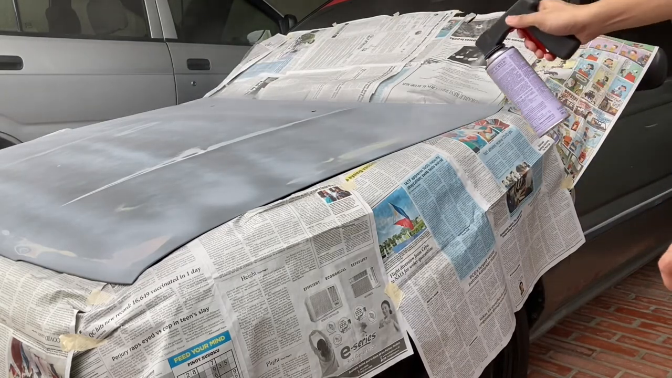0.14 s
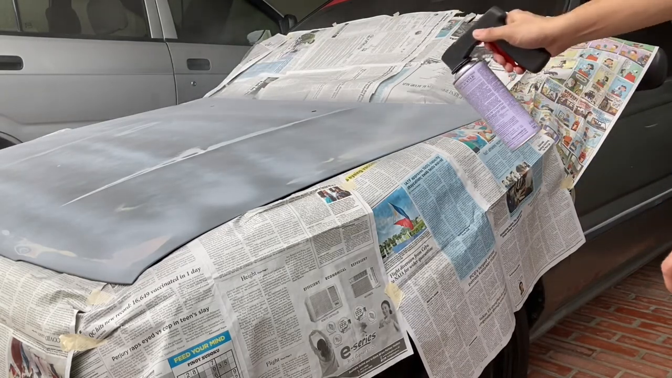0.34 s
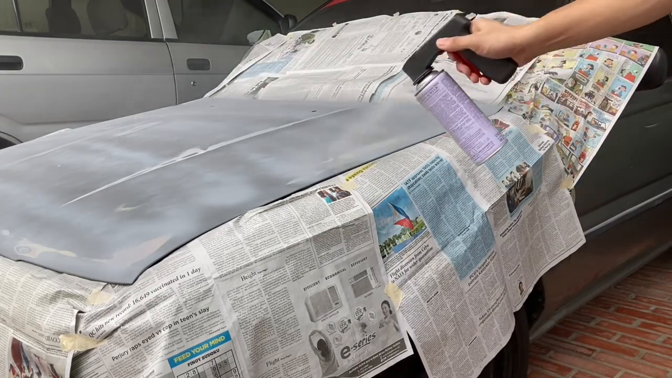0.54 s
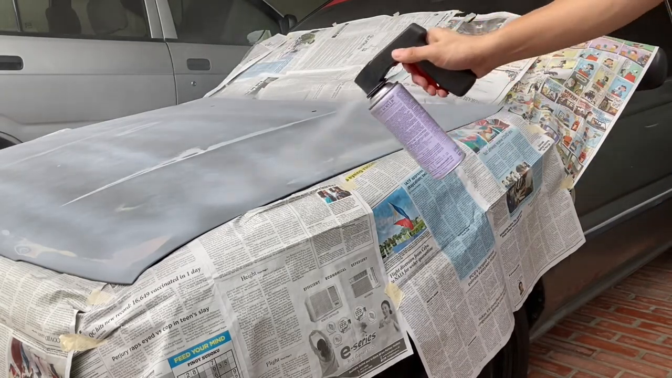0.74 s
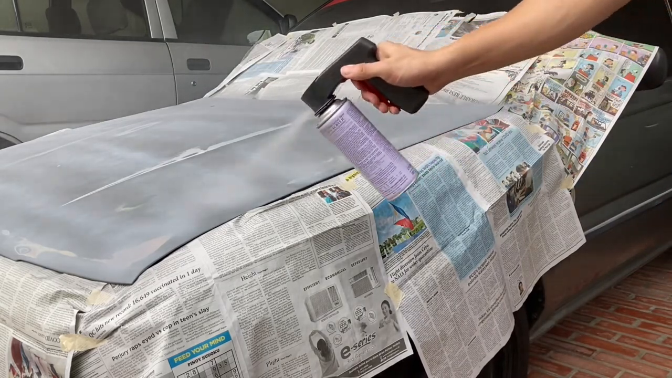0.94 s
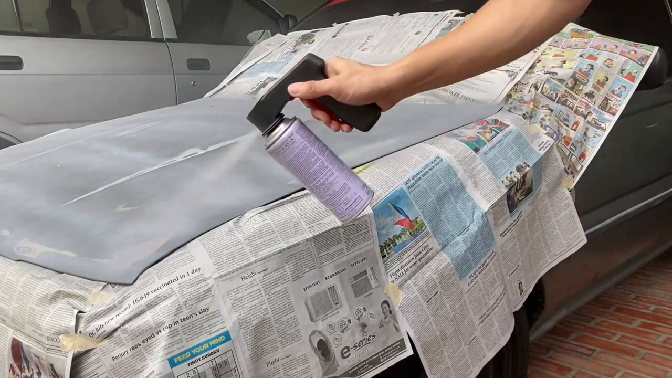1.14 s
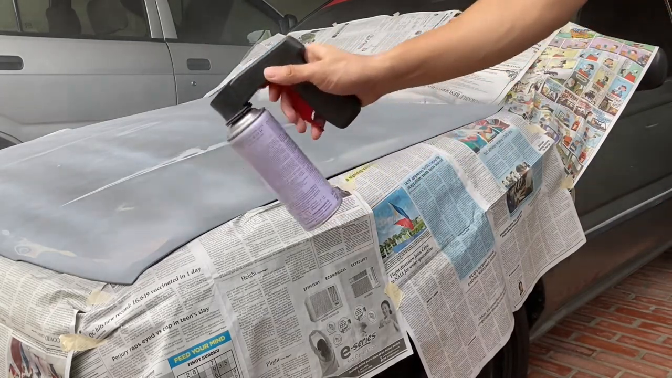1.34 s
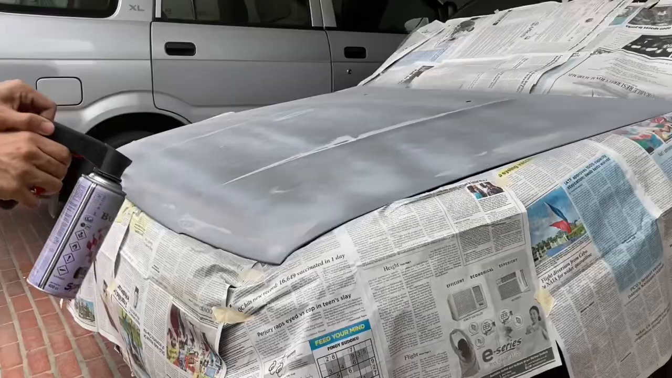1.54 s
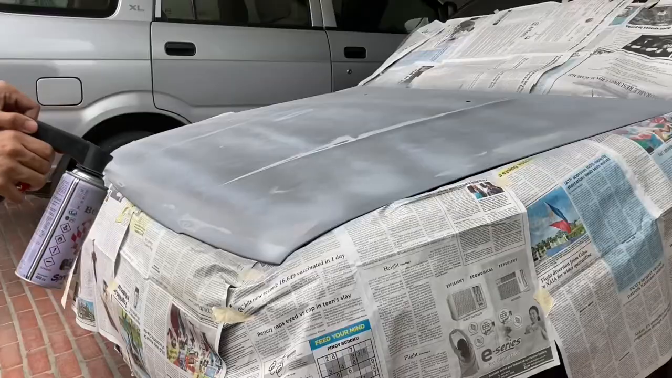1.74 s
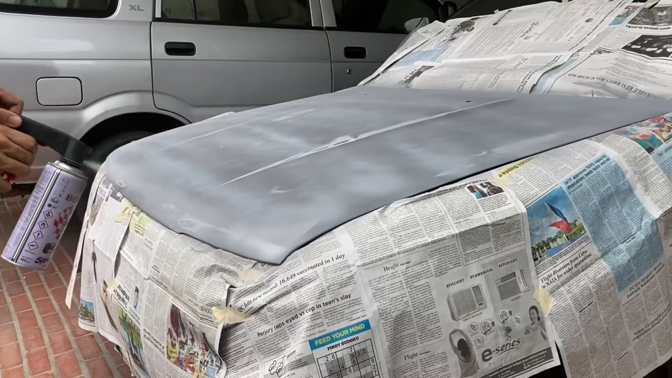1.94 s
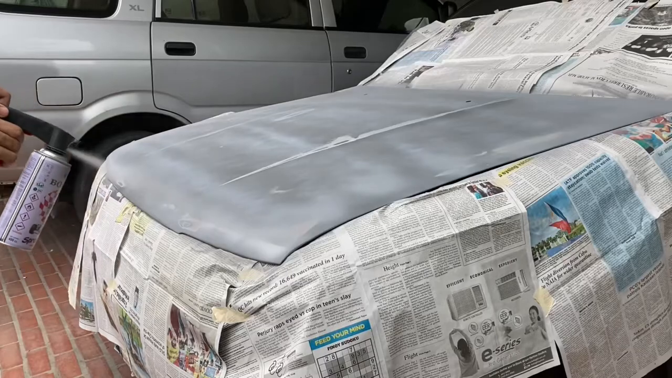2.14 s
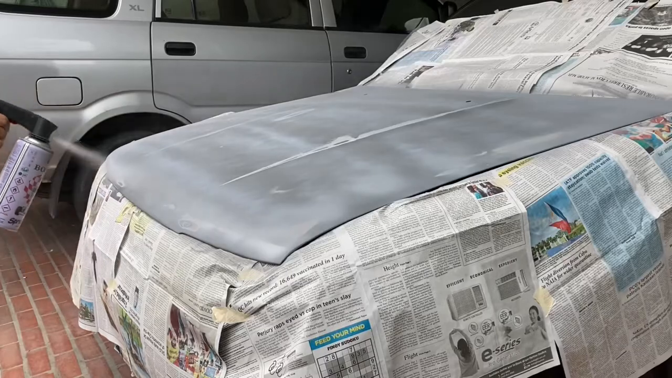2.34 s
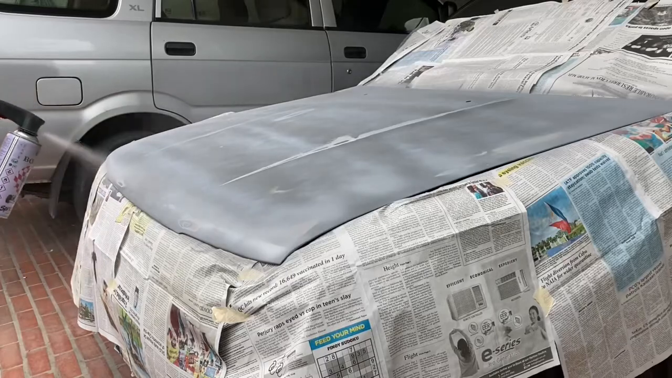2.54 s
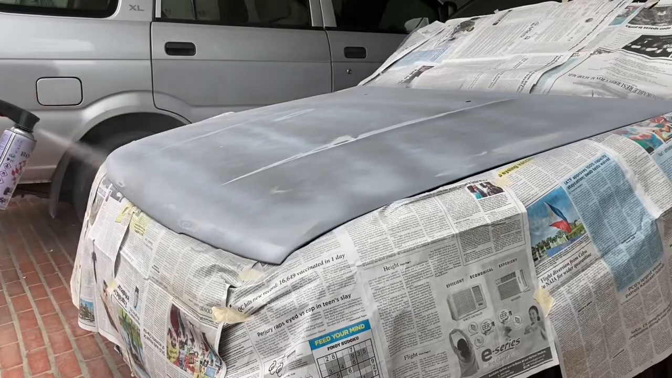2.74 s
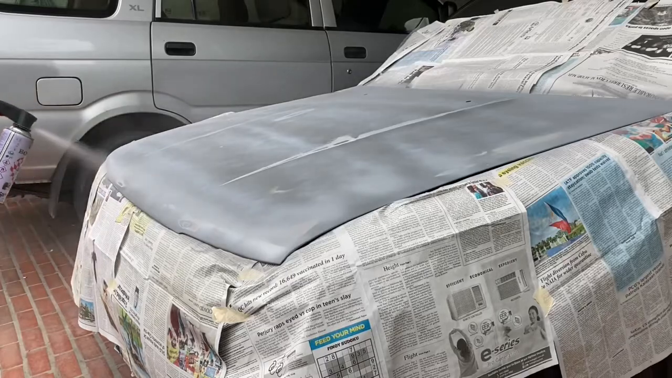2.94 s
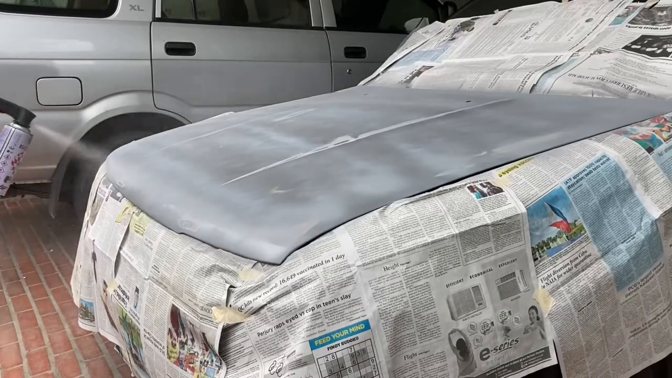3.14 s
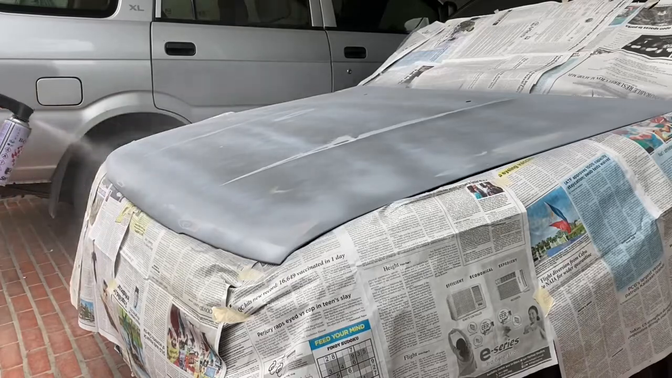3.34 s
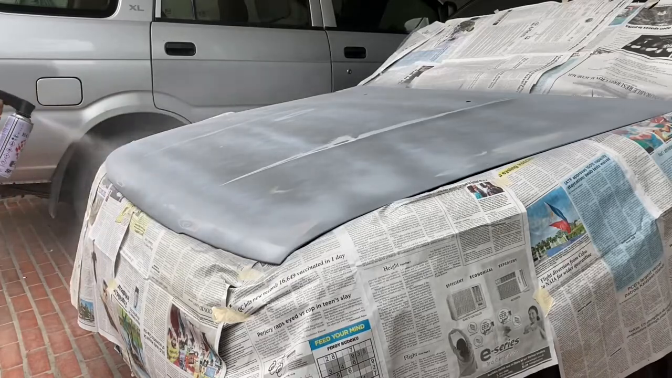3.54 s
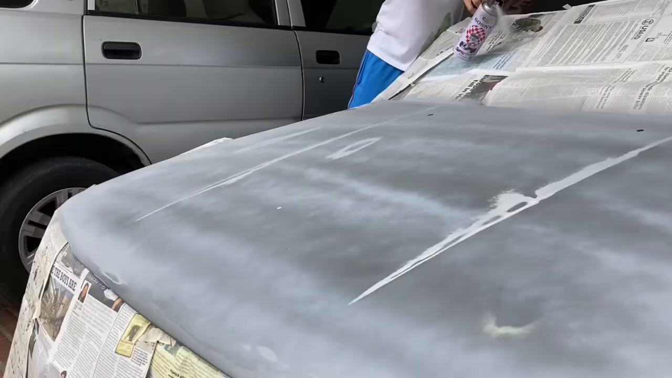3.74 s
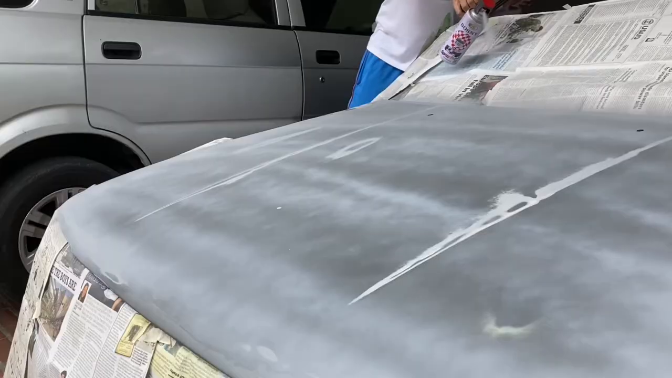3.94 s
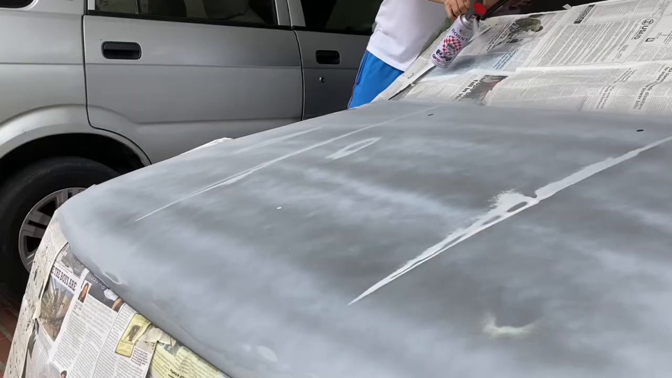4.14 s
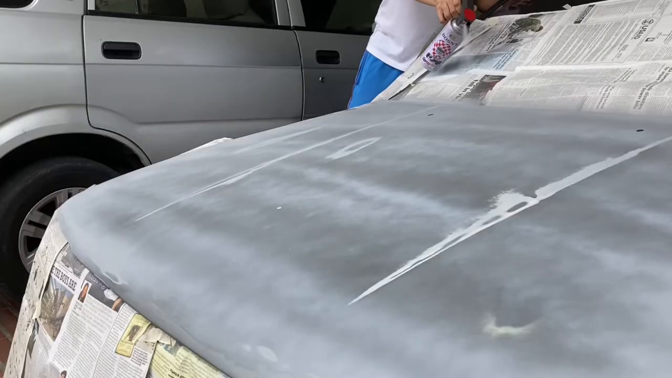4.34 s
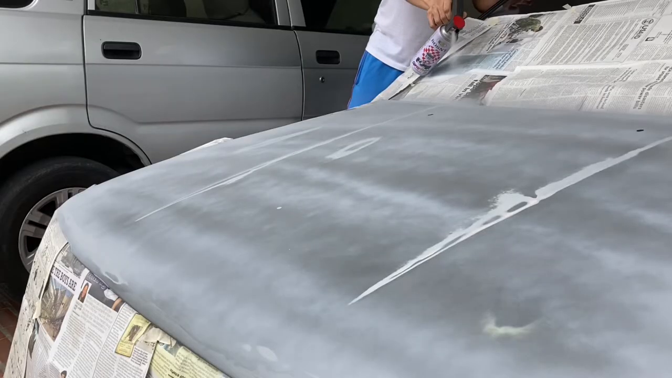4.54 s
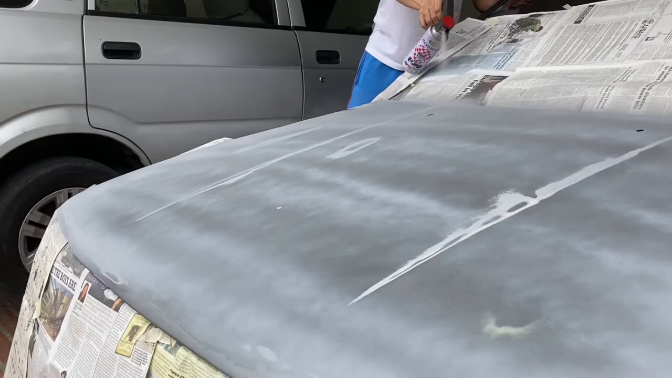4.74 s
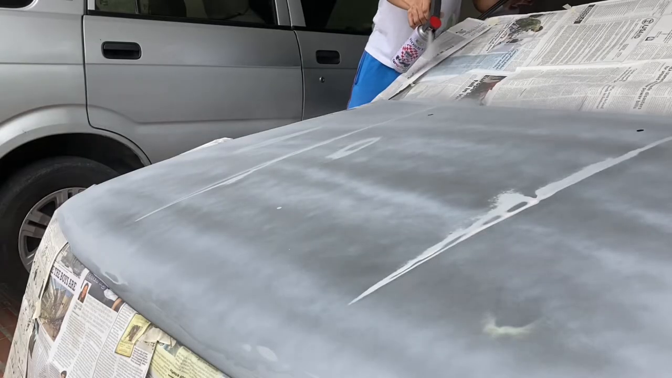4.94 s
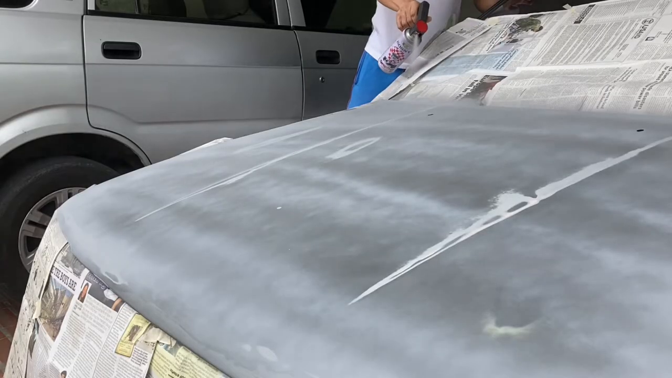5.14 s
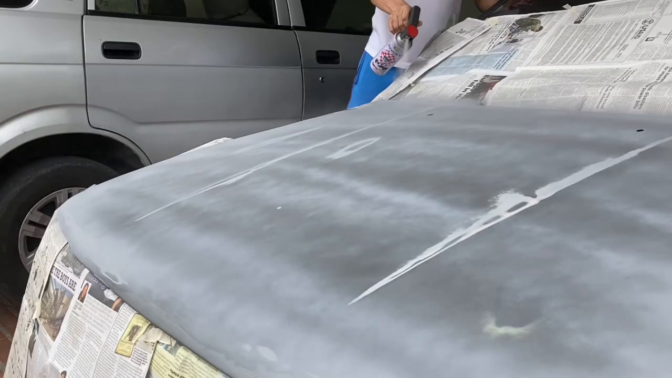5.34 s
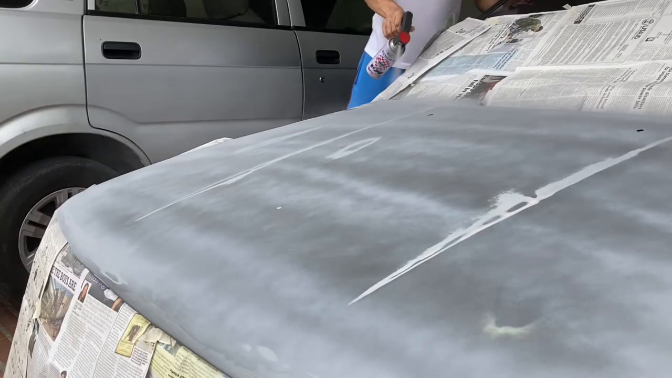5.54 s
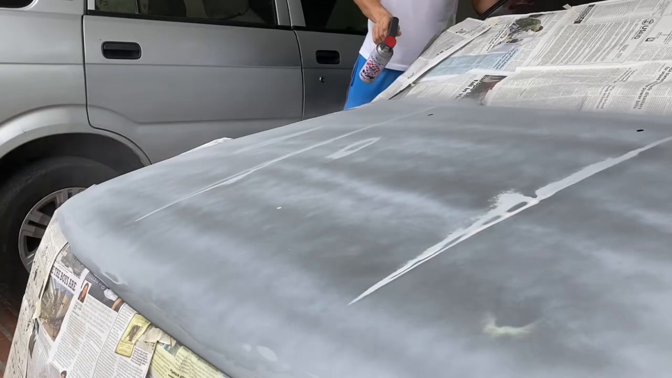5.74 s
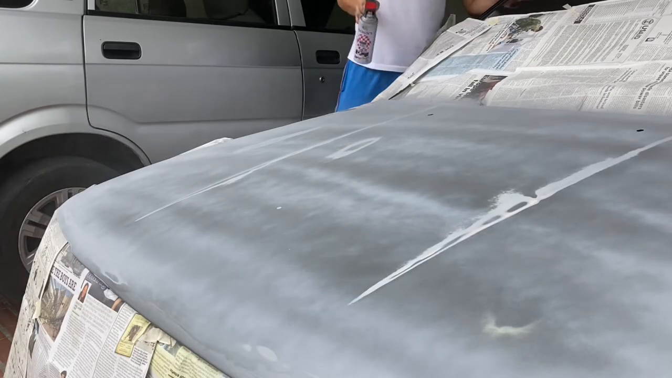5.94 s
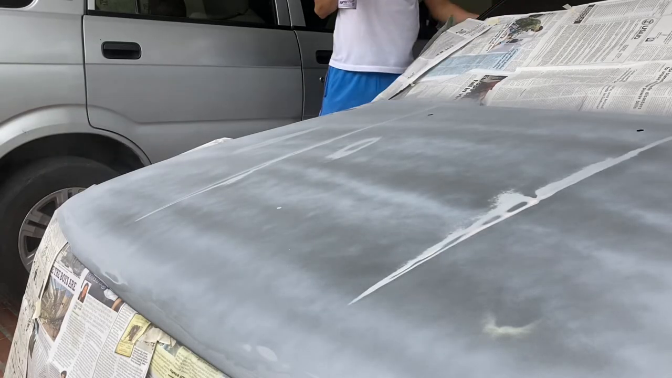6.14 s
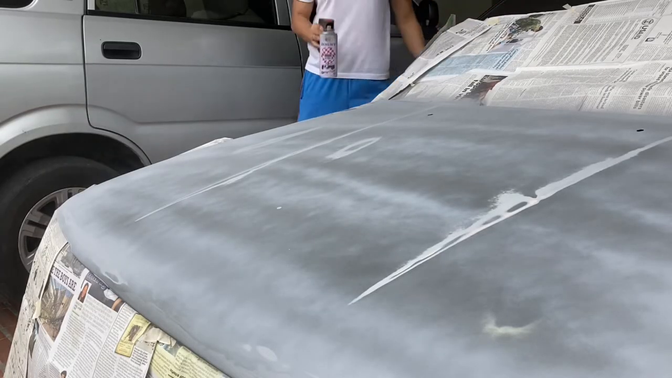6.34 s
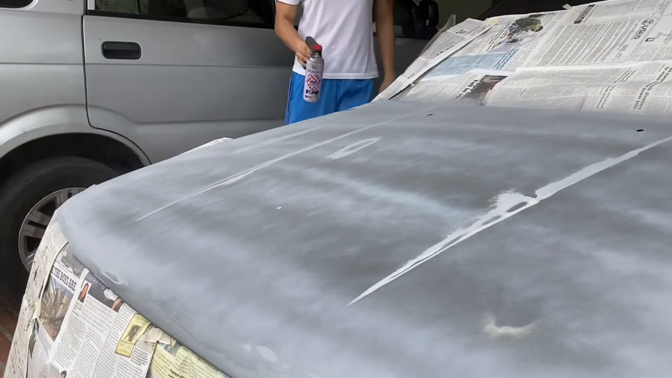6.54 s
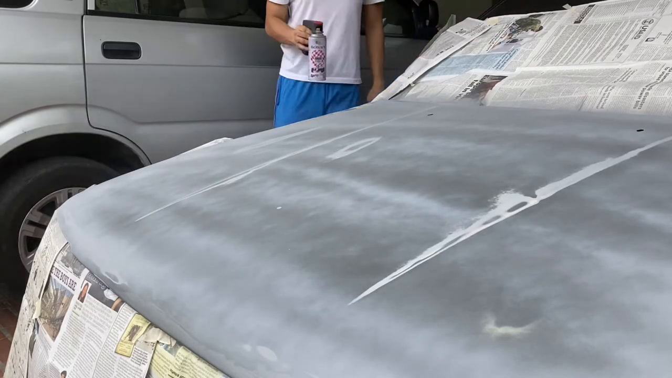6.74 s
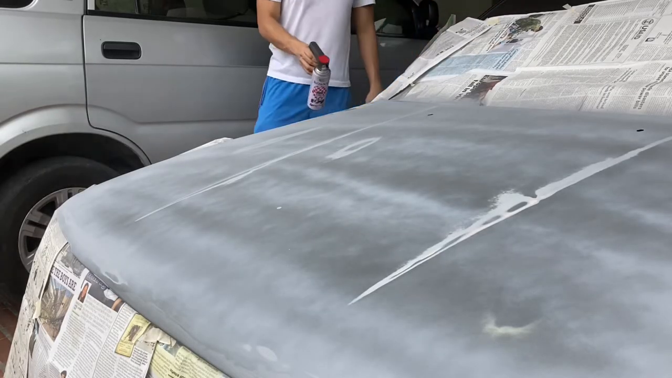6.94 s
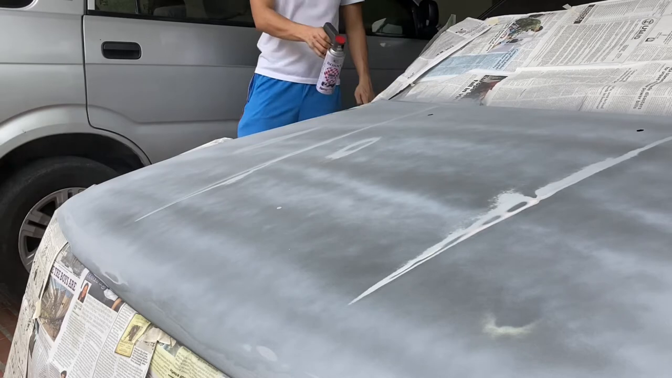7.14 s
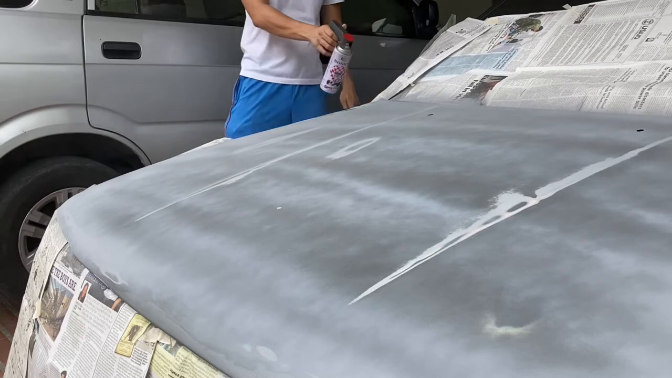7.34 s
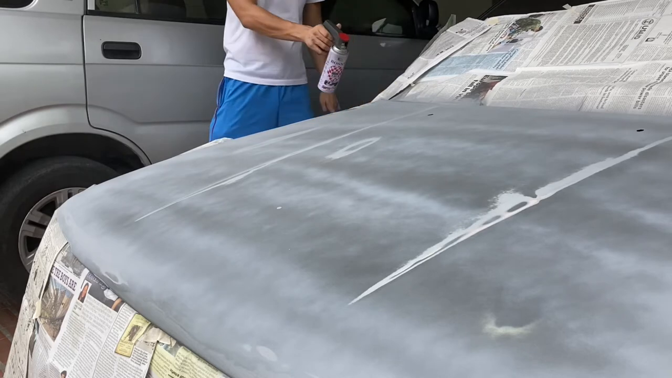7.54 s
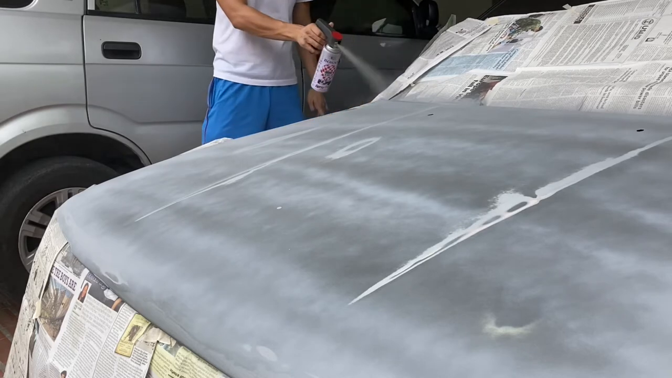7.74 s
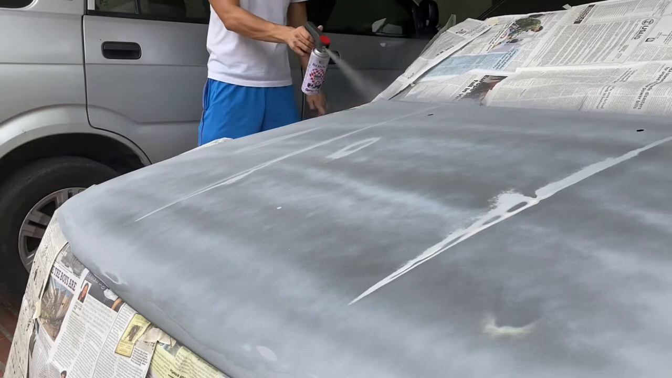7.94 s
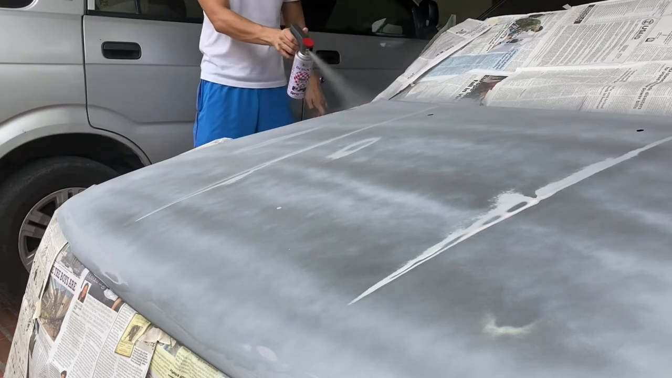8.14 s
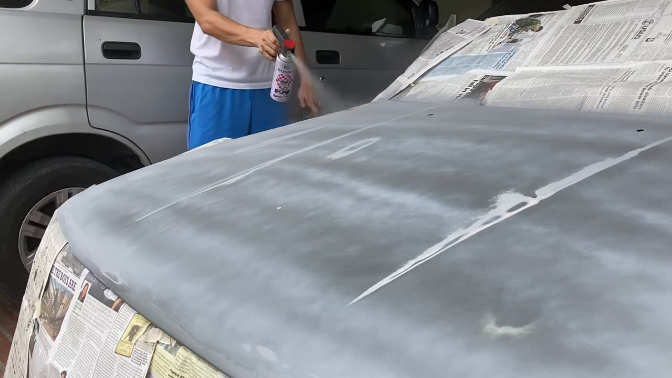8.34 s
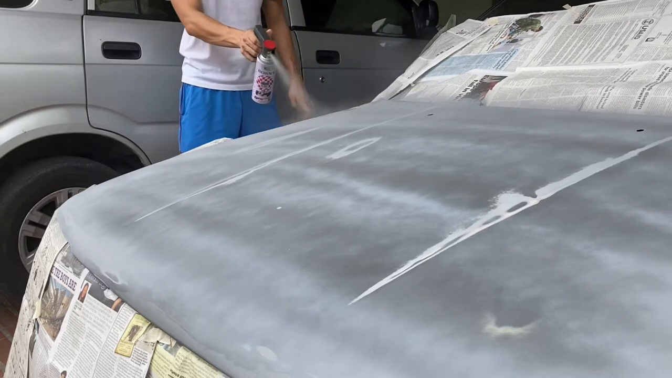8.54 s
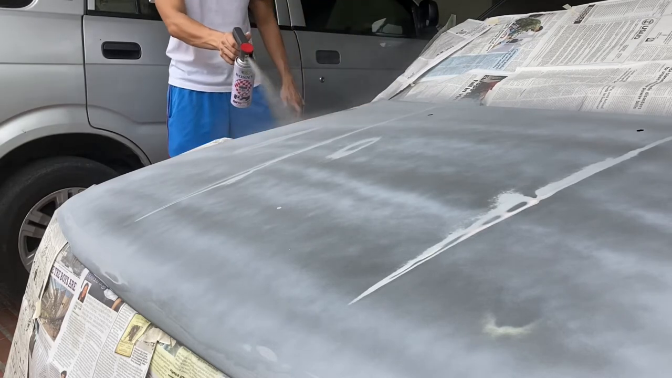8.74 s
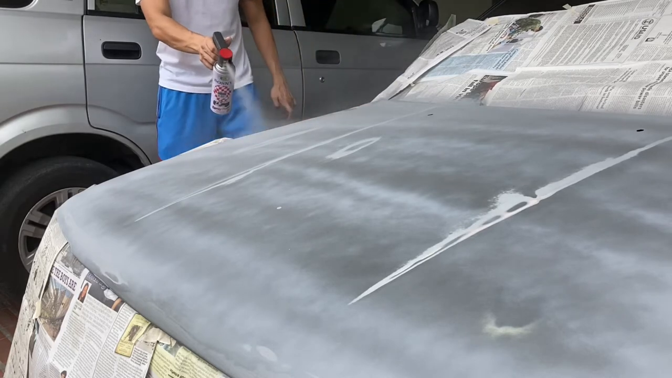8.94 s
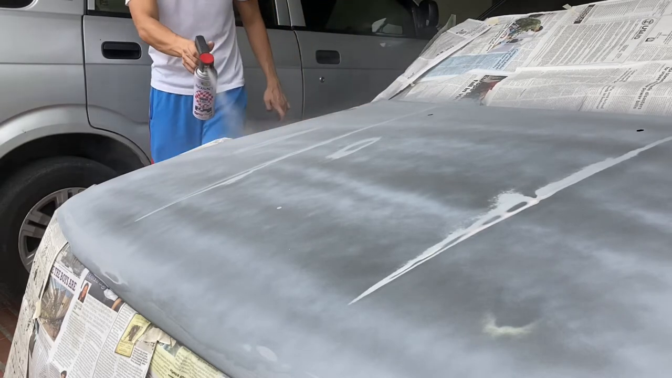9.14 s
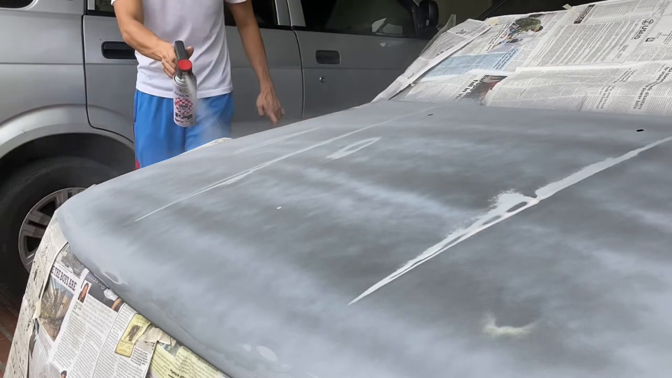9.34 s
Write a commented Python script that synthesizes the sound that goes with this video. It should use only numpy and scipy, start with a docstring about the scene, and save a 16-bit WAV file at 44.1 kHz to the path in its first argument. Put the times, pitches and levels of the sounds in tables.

```python
"""An aerosol can sprays a car bonnet in a brick yard: four passes, the first much louder, the others quieter.
The jet is shaped turbulent noise, with sliding bright and dark bands and sweeping ground and bonnet echoes.
Before the last pass the can is shaken: the ball rings damped modes, paint sloshes as gliding tones, foam fizzes.
Town rumble, faint far whines and one handling bump lie beneath, all shaped noise and gliding sines.
The can is heard through two close phone microphone ports; the whole level dips briefly after the second pass."""
import sys
import numpy as np
from scipy import signal
from scipy.fft import rfft, irfft, next_fast_len
from scipy.io import wavfile
from scipy.ndimage import map_coordinates

SR = 44100
rng = np.random.default_rng(int(sys.argv[2]) if len(sys.argv) > 2 else 0)


def output_pcm(signal):
    """Save a mono or channel-first signal as 16-bit PCM at the path in sys.argv[1].

    Samples are clipped to [-1, 1] before scaling.
    """
    pcm = np.clip(np.atleast_2d(signal).T, -1, 1) * 32767
    wavfile.write(sys.argv[1], SR, np.round(pcm).astype(np.int16))


N = 414099
T = np.arange(N) / SR
F = np.fft.rfftfreq(next_fast_len(N), 1 / SR) + 1e-6


def undb(db):
    """Decibels to gain."""
    return 10 ** (np.asarray(db) / 20)


def track(rows, t=T):
    """Columns of a curve, read at the times t."""
    s, *columns = np.transpose(rows)
    return [np.interp(t, s, column) for column in columns]


def slope(points, f=F, axis=1):
    """One dB column of a spectrum, joined on a log-frequency axis."""
    points = np.array(points)
    return np.interp(np.log(f + 1), np.log(points[:, 0]), points[:, axis])


def bell(f, centre, width):
    """A rounded peak of height 1 that falls to 1/e one width from its centre."""
    return np.exp(-((f - centre) / width) ** 2)


def shape(x, gain):
    """Filter by a gain for each frequency."""
    size = next_fast_len(N)
    return irfft(rfft(x, size) * gain, size)[..., :N]


def unit(x):
    """Scale to rms 1."""
    return x / np.sqrt(np.mean(x ** 2))


def walk(rate, size=N):
    """A random wander around zero: straight lines between fresh values, rate of them per second."""
    knots = rng.standard_normal(N // 10)
    return 1.035 * np.interp(np.arange(size) / SR * rate, np.arange(len(knots)), knots)


def add(out, s, x):
    """Mix x into out from the time s."""
    i = int(s * SR)
    out[i:i + len(x)] += x[:N - i]


def yard(x, t60=0.2):
    """Cars and walls scatter the sound into two unrelated short tails."""
    t = T[:SR // 2]
    tails = rng.standard_normal((2, len(t))) * undb(-60 * t / t60) * (t > .003)
    tails /= np.sqrt(np.sum(tails ** 2, axis=1, keepdims=True))
    return signal.oaconvolve(x[None], tails, axes=1)[:, :N]


# the can travels past the phone: t/s, lead of the left port/ms, top of the diffuse scatter f/Hz
CAN_PLACE = [(.1, 0.14, 6000), (1.05, 0.025, 6200), (1.33, -0.027, 6130), (1.45, -0.059, 6400),
             (2.7, -.13, 6400), (3.68, -0.11, 6400), (3.77, 0.12, 3170), (4.85, 0.16, 4290),
             (5.65, 0.068, 6000), (6, 0, 7700), (7.4, 0, 7700), (7.7, 0.055, 6350), (9.3, -.05, 6050)]
# resonances of the microphone ports: f/Hz, half width f/Hz, level/dB
PORT_RESONANCES = [(1980, 260, 2.8), (3500, 260, -2.2), (4050, 220, 4.7), (7150, 500, 4.2),
                   (8300, 220, -2.3), (9100, 350, 3.7), (9950, 350, -4.2), (12150, 300, 3.6),
                   (12800, 200, -0.6), (13300, 250, 3.7)]


def ports(direct, wash, in_step_hz=6900, half_turn_hz=2250, dwell=0.88, lean_db=1.05):
    """Two close ports: the nearer leads; treble falls in and out of step, and the wash follows suit."""
    f, t, (straight, *scattered) = signal.stft(np.vstack([direct, wash]), SR, nperseg=1024)
    f = f[:, None]
    lead_ms, scatter_hz = track(CAN_PLACE, t)
    # arrival time sets the phase in the lows, half turns with pauses set it in the treble
    low = 1 / (1 + (f / 6200) ** 40)
    arrival = low * np.clip(2 * np.pi * f * lead_ms / 1000, -np.pi, np.pi)
    turns = np.maximum(f - in_step_hz, 0) / half_turn_hz
    phase = arrival - np.pi * turns + dwell * np.sin(2 * np.pi * turns) / 2
    colour = undb(sum(db * bell(f, hz, width) for hz, width, db in PORT_RESONANCES))
    both = colour * np.cos(phase / 2)
    apart = colour * 1j * np.sin(phase / 2)
    diffuse = 1 / (1 + (f / scatter_hz) ** 20)

    def blend(gain, spread):
        """Direct sound plus wash: diffuse below the scatter limit, in the ports' phase above it."""
        return straight * gain + spread * (diffuse * colour * np.sqrt(.5) + (1 - diffuse) * gain)

    mid, side = blend(both, scattered[0]), blend(apart, scattered[1])
    # the left port is a little keener in the middle range
    lean = undb(lean_db * bell(f, 1800, 1100))
    return signal.istft(np.array([(mid + side) * lean, (mid - side) / lean]), SR)[1][:, :N]


# colour of the town rumble, relative: f/Hz, level/dB
TOWN_COLOUR = [(15, -59), (25, -25), (50, -4.5), (75, 0.5), (139, -5), (172, -9), (219, -9.5), (271, -15.5),
               (305, -16.5), (370, -21), (450, -16.5), (543, -21.5), (691, -22), (978, -26), (4750, -41),
               (9020, -57), (15000, -49.5)]


def town(wide_hz=430, swell_db=1, loud_db=-36.5, dropped_db=-48, settled_db=-51,
         loud_until_s=1.44, drop_s=0.043, settle_s=2.1):
    """Far traffic as shaped noise, shared in the bass and diffuse above; it drops, then slowly settles."""
    mid, side = unit(shape(rng.standard_normal((2, N)), undb(slope(TOWN_COLOUR))))
    side = shape(side, F / np.hypot(F, wide_hz))
    corners = np.cumsum((loud_until_s, drop_s, settle_s))
    level_db = np.interp(T, corners, (loud_db, dropped_db, settled_db))
    return np.array([mid + side, mid - side]) * undb(level_db + swell_db * walk(5.4))


# gliding tones: start t/s, loudest t/s, end t/s, first f/Hz, final f/Hz, level/dB, airy share (0-1)
FAR_WHINES = [(0.704, .85, 1.25, 296, 303, -41, 0), (1.996, 2.42, 2.74, 570, 590, -56, 0.6),
              (2.2, 2.27, 2.3, 757, 750, -55, 0.3), (2.639, 2.72, 3.3, 712, 746, -56, .95),
              (2.66, 2.82, 2.97, 863, 848, -55, 0.03), (2.86, 2.97, 3.3, 860, 918, -54, 1),
              (3.02, 3.15, 3.2, 792, 830, -55, 0.8), (3.05, 3.467, 3.69, 926, 931, -47, .12),
              (7.901, 8.1, 8.3, 613, 644, -58, 0.1), (8.181, 8.235, 8.45, 198, 213.4, -49, 0.26),
              (8.379, 8.524, 8.65, 227, 254.4, -50, .1)]


def whines(waver=0.005, octave_db=-19, flicker_db=3.1, swell_db=14, settling=2.2, scatter_db=-12, air_rate=150):
    """Faint tones swell as they glide, then hold pitch and fade: sines with a weak octave, or airy ones."""
    out = np.zeros(N)
    for start, loudest, end, first_hz, final_hz, db, airy in FAR_WHINES:
        t = np.arange(start, end, 1 / SR)
        airy = np.clip(airy, 0, 1)
        glide = np.interp(t, (start, loudest), (1, 0)) ** settling
        hz = final_hz + (first_hz - final_hz) * glide
        phase = 2 * np.pi * np.cumsum(hz * (1 + waver * walk(40, len(t)))) / SR
        clear = np.sin(phase) + undb(octave_db) * np.sin(2 * phase)
        # random strengths turn the tone into a narrow band of noise
        air = walk(air_rate, len(t)) * np.sin(phase) + walk(air_rate, len(t)) * np.cos(phase)
        away = np.interp(t, (start, loudest, end), (1, 0, 1)) ** 1.2
        swell = undb(db + flicker_db * walk(18, len(t)) - swell_db * away)
        add(out, start, swell * (np.sqrt(1 - airy) * clear + np.sqrt(airy / 2) * air))
    return out + undb(scatter_db) * yard(out)


# colour of the handling bump, before its level trim: f/Hz, level/dB
BUMP_COLOUR = [(50, -21), (150, 6.5), (400, -8.5), (900, -11), (1500, -1.5), (2500, -23), (3250, -19),
               (4200, -17), (8000, -40)]


def bump(at_s=2.62, length_s=0.016, level_db=-25):
    """A dull, brief bump of handling: a short swell of shaped noise."""
    return shape(rng.standard_normal(N) * bell(T, at_s, length_s), undb(level_db + slope(BUMP_COLOUR)))


def rustle(at_s=6.25, length_s=0.053, centre_hz=620, width_hz=300, level_db=-39.0,
           swish_hz=8000, swish_width_hz=5000, swish_db=-59):
    """A soft, low rustle with a thin swish as the can is lifted: one swell of noise in two bands."""
    colour = undb(level_db) * bell(F, centre_hz, width_hz) + undb(swish_db) * bell(F, swish_hz, swish_width_hz)
    return shape(rng.standard_normal(N) * bell(T, at_s, length_s), colour)


# colour shared by cracks, pings and fizz, relative: f/Hz, level/dB
CRACK_COLOUR = [(150, -46), (500, -20), (1000, -9.5), (2100, 4), (3200, 3), (5000, -4), (7500, -3),
                (9500, 6.5), (12000, -7.5), (15500, -10)]


def crack_gain():
    """Gain over frequency of the can's dry, bright noises."""
    return undb(slope(CRACK_COLOUR))


# bouts of shaking whip up foam: start t/s, end t/s, strength before trims level/dB
SHAKE_BOUTS = [(6.034, 6.076, -49), (6.447, 6.677, -35.5), (6.88, 7.36, -43.5)]


def foam(rise_db_per_s=320, sag_db_per_s=18, fall_db_per_s=110):
    """Foam strength: rises quickly into each bout, sags while the shaking lasts, dies away after it."""
    strength = 0
    for start, end, db in SHAKE_BOUTS:
        before = rise_db_per_s * np.maximum(start - T, 0)
        during = sag_db_per_s * np.clip(T - start, 0, end - start)
        after = fall_db_per_s * np.maximum(T - end, 0)
        strength = strength + undb(db - before - during - after)
    return strength


# sloshes ring the gas pocket: t/s, length t/s, lowest f/Hz, step to each of the next three f/Hz,
# glide (share of the pitch), then one level/dB for each of the four tones
PAINT_SLOSHES = [(6.034, .016, 1113, 166, -0.0046, -46.5, -49, -54, -58),
                 (6.34, .012, 1430, 165, 0, -58, -51, -48, -54),
                 (6.376, 0.033, 873, 426, 0.058, -48, -32.5, -41, -44),
                 (6.391, .02, 892, 445, .01, -54, -41, -34, -42),
                 (6.403, .032, 897, 470, 0.0071, -32, -31.5, -39, -43),
                 (6.432, 0.029, 898, 446, 0.0089, -39, -48, -40, -50),
                 (6.458, 0.029, 1010, 535, 0, -37, -33, -44, -46),
                 (6.474, 0.027, 985, 430, .02, -38, -48, -36, -42),
                 (6.513, 0.034, 953, 325, -0.0011, -34, -28.5, -31, -41),
                 (6.548, 0.032, 997, 338, 0, -39, -46, -38, -51),
                 (6.578, 0.029, 960, 327, 0, -50, -41, -48, -57),
                 (6.604, 0.018, 956, 463, -0.0034, -46, -52, -32, -36),
                 (6.636, .016, 1010, 440, 0, -30.5, -48, -36, -46),
                 (6.725, .015, 1040, 330, 0, -45, -36, -46, -47),
                 (6.742, .022, 945, 364, .06, -37, -44, -39.5, -52),
                 (6.812, 0.027, 896, 337, .02, -48, -42, -45, -52),
                 (6.861, .028, 907, 352, 0.023, -51, -44, -49, -60),
                 (7.011, .023, 1240, 280, -.02, -46, -40, -37, -46),
                 (7.118, 0.029, 980, 298, 0, -47, -42.5, -52, -60),
                 (7.15, .04, 1020, 320, 0.026, -47, -46, -51, -60)]


def paint(wobble=0.017, rough=0.43, attack_share=0.21, grain_db=6, foam_db=-9.0):
    """Each slosh rings a gas pocket of changing size as four gliding tones; bursting bubbles fizz as noise."""
    out, t = np.zeros(N), T[:SR // 5]
    for s, length, lowest_hz, step_hz, glide, *levels in PAINT_SLOSHES:
        swell = np.minimum(t / (attack_share * length), 1) * np.exp(-(t / length) ** 2 * 2)
        for k, db in enumerate(levels):
            bend = 1 + glide * t / length + wobble * walk(200, len(t))
            pitch = (lowest_hz + k * step_hz) * bend
            strength = undb(db) * (1 + rough * walk(167, len(t)))
            add(out, s, strength * swell * np.sin(2 * np.pi * np.cumsum(pitch) / SR))
    grains = rng.standard_normal(N) * undb(grain_db * walk(600))
    return out + shape(grains, crack_gain()) * foam() * undb(foam_db)


def clatter(level_db=7, uneven_db=7, contact_s=0.0009, ping_hz=1900, ping_octaves=0.88,
            ping_s=0.0027, ping_db=-8, count=140):
    """The ball skitters along the wall: random noise ticks and tiny pings that follow the foam strength."""
    out, t = np.zeros(N), T[:SR // 30]
    first_s, last_s = SHAKE_BOUTS[1][0], SHAKE_BOUTS[-1][1]
    for where, size, pitch in rng.random((count, 3)):
        tick = rng.standard_normal(len(t)) * np.exp(-t / contact_s)
        hz = ping_hz * 2 ** (ping_octaves * (pitch - .5))
        ping = np.sin(2 * np.pi * hz * t) * np.exp(-t / ping_s)
        gain = undb(level_db + uneven_db * (2 * size - 2.5))
        add(out, first_s + where * (last_s - first_s), gain * (tick + undb(ping_db) * ping))
    return shape(out, crack_gain()) * foam()


# the ball strikes: t/s, ring before its trim level/dB, crack before its colour level/dB,
# contact decay t/s, ring f/Hz, ring t60 before each mode's share t/s
BALL_KNOCKS = [(5.957, -45, -64, 0.0089, 3500, .03), (6.059, -47, -44, .0076, 1900, .03),
               (6.392, -45, -39.5, 0.014, 1800, .03), (6.456, -16.5, -19.5, 0.0076, 2800, 0.022),
               (6.463, -23, -21.5, 0.0075, 2165, 0.044), (6.499, -28, -37, .004, 2130, 0.034),
               (6.544, -25, -28.5, 0.0064, 1750, 0.044), (6.604, -23, -36, 0.0051, 1950, .04),
               (6.638, -25.5, -30.5, .0054, 2010, .035), (6.729, -33, -45, .0026, 2000, .025),
               (6.815, -44, -47, .0036, 1700, .03), (6.902, -15.5, -21.5, 0.0054, 1937, 0.036),
               (6.912, -24, -33, 0.0024, 1940, .03), (6.961, -20, -19, 0.0031, 2000, 0.046),
               (6.971, -32, -37, .003, 1840, .025), (7.014, -39, -40, .008, 1830, .04),
               (7.051, -20, -25, 0.0031, 2045, 0.032), (7.121, -40, -37, 0.0071, 1800, .03),
               (7.138, -21.5, -25.5, 0.0025, 1950, 0.034), (7.159, -30, -38, .004, 1980, .025),
               (7.221, -29.5, -40, 0.0045, 2080, 0.02), (7.298, -24.5, -38, 0.0058, 1920, .022),
               (7.391, -34.5, -42.5, 0.0058, 1930, .02)]
# modes of the paint-damped can: multiple of the ring's pitch, relative level/dB, share of the ring's t60
CAN_MODES = [(.66, -30, 1), (.88, -21, 1), (.97, 6.5, 0.96), (1.06, 3, 0.85), (1.15, -5, 0.77),
             (1.44, -10, 1), (1.7, -13, .9), (2.03, -18, .45), (3.5, -26, .7)]


def ball(ring_db=3, detune=0.025, uneven_db=2, rebound_s=0.008, rebound_db=-10, blow_db=-2):
    """Each knock excites the damped can modes with a sharp blow, a short noisy scrape and a rebound."""
    rings, cracks, t = np.zeros(N), np.zeros(N), T[:SR // 5]
    ratio, db, lasting = np.transpose(CAN_MODES)[:, :, None]
    for s, knock_db, crack_db, contact, hz, t60 in BALL_KNOCKS:
        again = t - rebound_s * np.exp(0.3 * rng.standard_normal())
        rebound = undb(rebound_db) * (again > 0) * np.exp(-np.abs(again) / contact)
        scrape = rng.standard_normal(len(t)) * (np.exp(-t / contact) + rebound)
        shift, weight = rng.standard_normal((2, len(ratio), 1))
        mode_hz = hz * ratio * (1 + detune * shift)
        modes = np.sin(2 * np.pi * mode_hz * t) * undb(-60 * t / (t60 * lasting))
        scraped = signal.fftconvolve(modes, scrape[None] / np.linalg.norm(scrape), axes=1)[:, :len(t)]
        ringing = undb(blow_db) * modes + scraped
        ringing *= undb(db + uneven_db * weight) / np.abs(ringing).max(axis=1, keepdims=True)
        ring = ringing.sum(0)
        add(rings, s, undb(knock_db + ring_db) * ring / np.abs(ring).max() / 2)
        add(cracks, s, undb(crack_db) * scrape)
    return rings + shape(cracks, crack_gain())


def shaking(direct_db=-2, wash_db=-5.5):
    """The shaken can: one row of direct sound and two rows of yard wash."""
    can = ball() + paint() + clatter() + rustle()
    return np.vstack([undb(direct_db) * can, undb(wash_db) * yard(can, t60=0.33)])


# the valve, one row a pass: opens t/s, closes t/s, opening time t/s, dying-away time t/s
VALVE_PASSES = [(-.05, 1.31, .02, 0.012), (1.41, 3.70, 0.035, 0.0036), (3.724, 5.69, 0.028, 0.019),
                (7.59, 9.5, 0.057, 0.018)]


def stroke(index, first, last, t=T):
    """The hand's even travel: a value moves from first to last during one pass."""
    return np.interp(t, VALVE_PASSES[index][:2], (first, last))


# aim of the nozzle, one curve a pass: t/s, dark band f/Hz, depth of the lobes (1 = full)
NOZZLE_AIM = [
    [(.1, 9550, 0.08), (.75, 7750, 0.3), (1.25, 6700, 0.11)],
    [(1.9, 8300, .15), (2.4, 8900, 0.44), (2.75, 9500, .15), (3.5, 11000, 0.14)],
    [(3.78, 7800, 0.49), (4.1, 7940, 1.2), (4.3, 8640, 0.52), (4.48, 9300, 1.2), (4.95, 9700, 0.73),
     (5.2, 11200, 0.67), (5.42, 12500, 1), (5.68, 12900, 0.74)],
    [(7.65, 12450, 1.34), (8.25, 12800, 1.1), (8.5, 11000, 0.72), (8.75, 9800, 0.84), (9.3, 9340, 1.2)],
]
# bands that slide with the aim: multiple of the dark band's pitch, half width (same unit),
# level at full depth/dB
NOZZLE_LOBES = [(.76, 0.091, 1), (1, 0.098, -6), (1.27, 0.14, 4.5), (1.55, .1, -1), (1.95, .17, 8.5)]
# resonance between can and bonnet, sliding with the hand: t/s, f/Hz, height level/dB
BONNET_GAP = [(.55, 7500, -1), (.85, 6600, 4), (1.2, 5900, -2), (1.9, 5900, 4), (2.35, 6480, 4),
              (2.65, 7450, 7), (2.95, 8060, 3), (3.7, 8400, -2.5)]
# lift of the hiss's upper middle range: t/s, level/dB
HISS_PRESENCE = [(0, 3), (.6, 0), (1.1, 1), (1.5, -2), (2.15, 0.5), (2.5, 1.5), (2.65, 7), (3.05, 7),
                 (3.2, 1), (3.7, 1.5), (4.3, 6.5), (5.3, 0), (7.8, -2.5), (9.2, 1.5)]


def moving_colour(index, f, t, ripple_hz=1100, reach_hz=900, presence_hz=4400, presence_width_hz=1400):
    """Changing hiss colour in dB: the nozzle's lobes, the rippled gap resonance and the upper middle range."""
    dark_hz, depth = track(NOZZLE_AIM[index], t)
    gap_hz, gap_db = track(BONNET_GAP, t)
    presence_db, = track(HISS_PRESENCE, t)
    lobes = depth * sum(db * bell(f / dark_hz, ratio, width) for ratio, width, db in NOZZLE_LOBES)
    gap = gap_db * bell(f, gap_hz, reach_hz) * np.cos(2 * np.pi * (f - gap_hz) / ripple_hz)
    return lobes + gap + presence_db * bell(f, presence_hz, presence_width_hz)


# slide of the treble streaks as the hand moves, one value a pass: slide/(octaves per s)
STREAK_SLIDES = [-.2, 0.132, 0.06, -.08]


def streaks(index, f, t, depth_db=1.5, spacing_hz=260, renew_rate=3, above_hz=6000):
    """Random narrow treble ridges, in dB, slide together and blend into new ones, renew_rate per second."""
    across = f * 2 ** (-STREAK_SLIDES[index] * t) / spacing_hz
    places = np.broadcast_arrays(across, t * renew_rate)
    ridges = map_coordinates(rng.standard_normal((256, 64)), places, order=1, mode="mirror")
    return depth_db * ridges * f ** 4 / (f ** 4 + above_hz ** 4)


# colour of the jet, relative: f/Hz, then one level/dB for each of the four passes
JET_HISS = [(197, -4, -4, -10, -5.5), (505, -17.5, -17, -13, -29), (815, -16, -10.5, -13.5, -10.5),
            (1253, -10.5, -9, -7, -6), (1905, -4, -2, -4.5, 0.6), (2920, -13, -12.5, -14.5, -15),
            (5050, -17.5, -14, -13.5, -12.5), (6560, -10.5, -5.5, -11, -6), (7510, -13, -10, -5, -8),
            (10030, 0.5, 3.5, 1.5, 2), (11900, -5.5, -5, -0.5, 1), (14200, -3.5, -1.5, 1, 0),
            (15560, -7, -3, -1.5, -2.5)]
# one row a pass: level at start/dB, level at end/dB, low rush level at start/dB, low rush level at end/dB
HAND_STROKES = [(-15.5, -13, -1.5, 0.5), (-30.5, -33.5, 0, -2), (-31.5, -33, -3, 1.1), (-34, -32, -2, -2.5)]
# echoes off ground and bonnet, one row a pass: delay at start t/ms, delay at end t/ms,
# level against the hiss/dB
GROUND_BOUNCE = [(3.2, 3.78, -5), (3.55, 2.1, -7.5), (7.4, 7.9, -7), (6.05, 8.2, -4)]
BONNET_BOUNCE = [(0.56, 1.3, -13), (1.28, 0.7, -38), (0.487, 0.285, -15), (0.336, 0.268, -14)]


def spray(index, rush_hz=3500, lowest_hz=150, sputter_db=1.23, sputter_rate=110, waver_db=0.97,
          direct_db=-2.22, wash_db=-4.0, mist_db=-11):
    """One pass of a turbulent jet: aimed, sputtering noise, as one direct row and two rows of wash."""
    opens, closes, opening, dying = VALVE_PASSES[index]
    # one noise for the direct hiss, two for the spreading mist
    f, t, noise = signal.stft(rng.standard_normal((3, N)), SR, nperseg=512)
    f = f[:, None]
    first_db, last_db, first_rush_db, last_rush_db = HAND_STROKES[index]
    level_db = stroke(index, first_db, last_db, t)
    rush_db = stroke(index, first_rush_db, last_rush_db, t) / (1 + (f / rush_hz) ** 4)
    db = level_db + slope(JET_HISS, f, axis=index + 1) + rush_db
    db = db + moving_colour(index, f, t) + streaks(index, f, t - opens)
    low_cut = f ** 2 / np.hypot(f ** 2, lowest_hz ** 2)
    hiss = signal.istft(noise * undb(db) * low_cut, SR)[1][:, :N]

    valve = np.clip((T - opens) / opening, 0, 1) ** 2 * np.exp(-np.clip(T - closes, 0, 1) / dying)
    # droplets make the jet sputter
    hiss = hiss * valve * undb(sputter_db * walk(sputter_rate) + waver_db * walk(12))

    # each echo combs the hiss, and the comb sweeps as the hand moves
    bounced = 0
    for first_ms, last_ms, echo_db in (GROUND_BOUNCE[index], BONNET_BOUNCE[index]):
        delay_s = stroke(index, first_ms, last_ms) / 1000
        bounced = bounced + undb(echo_db) * np.interp(T - delay_s, T, hiss[0])
    # walls ring the hiss with fixed ripples; the drifting mist adds a smooth share
    wash = undb(wash_db) * yard(hiss[0]) + undb(mist_db) * hiss[1:]
    return np.vstack([undb(direct_db) * (hiss[0] + bounced), wash])


# escaping gas keeps can and nozzle ringing faintly: f/Hz, half width f/Hz, level/dB
GAS_RINGS = [(2013, 25, 4), (2271, 22, 4.5), (3739, 12, 4), (7299, 25, 3)]


def jet():
    """All four passes, with narrow peaks where can and nozzle ring."""
    ringing = undb(sum(db * bell(F, hz, width) for hz, width, db in GAS_RINGS))
    return shape(sum(spray(i) for i in range(len(VALVE_PASSES))), ringing)


def scene(dip_s=3.724, dip_width_s=0.0053, dip_db=-20):
    """All sources; the level dips briefly between the second and third pass."""
    can = jet() + shaking()
    out = ports(can[0], can[1:]) + town() + whines() + bump()
    return out * undb(dip_db * bell(T, dip_s, dip_width_s))


def record(dry, top_hz=15800):
    """The phone cuts the top steeply, with a 12th-order elliptic low-pass."""
    return signal.sosfilt(signal.ellip(12, .2, 80, top_hz, fs=SR, output="sos"), dry)


dry = scene()
out = record(dry)
output_pcm(out)
```